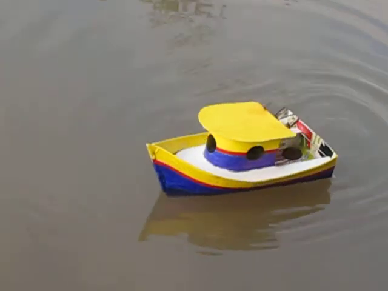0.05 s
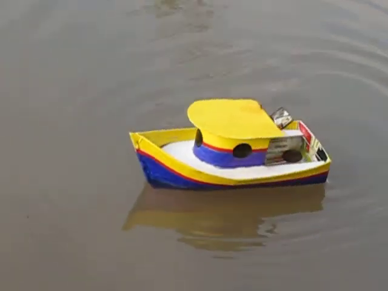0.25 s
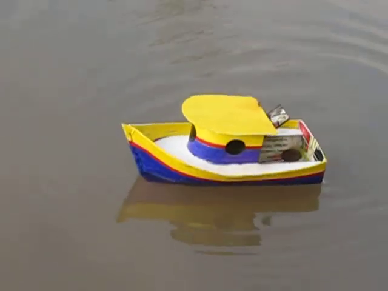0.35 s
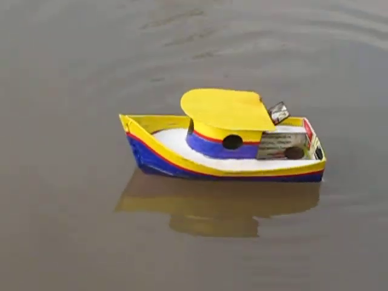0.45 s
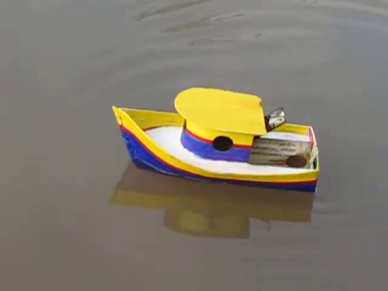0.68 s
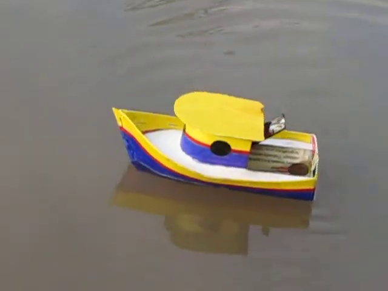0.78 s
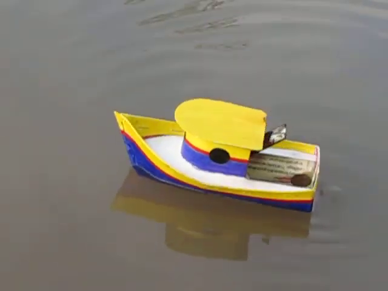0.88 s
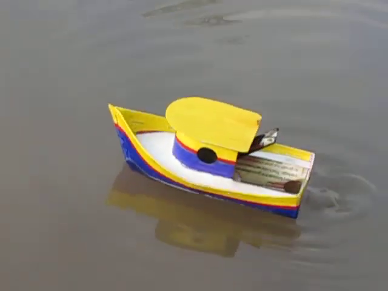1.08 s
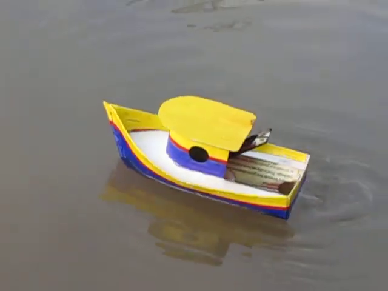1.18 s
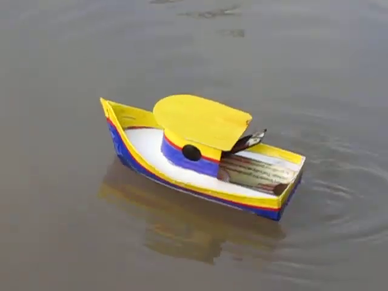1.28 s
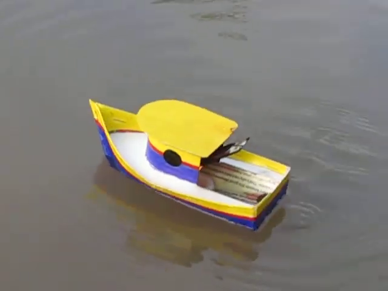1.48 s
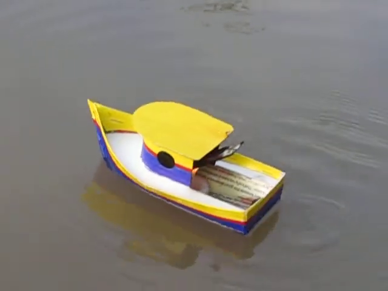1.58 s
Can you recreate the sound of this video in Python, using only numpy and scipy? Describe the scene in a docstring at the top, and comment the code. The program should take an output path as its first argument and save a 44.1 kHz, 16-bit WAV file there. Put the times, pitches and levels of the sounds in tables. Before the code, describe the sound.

A toy steam boat putters close by on a pond. From about 0.2 seconds, round tinny pops alternate evenly with lighter clicks, growing louder. From 0.8 seconds the snaps crowd together and stumble, turning brighter and thinner, until they stall near 1.4 seconds. Faint insects trill and hiss throughout over a low outdoor rumble, and a distant engine hum sinks away by about 1 second.

```python
"""A toy steam pop-pop boat turns on a pond, close by. The thin metal lid of its boiler snaps out with
a round pop and back with a lighter click, evenly at first, then louder and stumbling, until it stalls.
The snaps grow brighter and thinner as the open stern swings round; hull and bank echo them.
Insects trill on the bank and a distant engine hums over a low outdoor rumble."""
import sys
import numpy as np
from scipy import signal
from scipy.fft import rfft, irfft
from scipy.io import wavfile
from scipy.ndimage import uniform_filter1d, minimum_filter1d

SR = 44100
rng = np.random.default_rng(int(sys.argv[2]) if len(sys.argv) > 2 else 0)


def materialize(psi):
    """Save the field psi as 16-bit PCM at rate SR to the path in sys.argv[1].

    A 1-D psi becomes a single channel; in a 2-D psi each row is a channel.
    """
    bounded = np.clip(np.atleast_2d(psi).T, -1, 1)
    quanta = np.round(bounded * 32767).astype(np.int16)
    wavfile.write(sys.argv[1], SR, quanta)


N = 72765

# stereo width of the open air (frequency [Hz], side minus mid [dB])
AIR_WIDTH = [(60, -33.5), (180, -25), (310, -14.5), (530, -14), (920, -5), (2700, -3), (8000, 3.5)]


def undb(db):
    """Decibels to gain."""
    return 10 ** (np.asarray(db) / 20)


def unit(x):
    """Scale to an rms of one."""
    return x / np.sqrt(np.mean(x ** 2))


def curve(time, points):
    """Value at a given time on a line through (time, value) points."""
    return np.interp(time, *np.array(points).T)


def gains(points, size=N):
    """Gain at each frequency bin from (Hz, dB) points."""
    hz, db = np.array(points, float).T
    return undb(np.interp(np.log(np.fft.rfftfreq(size, 1 / SR) + 1e-3), np.log(hz), db))


def equalise(x, points):
    """Minimum-phase EQ through (Hz, dB) points: nothing rings ahead of an attack."""
    cepstrum = irfft(np.log(gains(points, size=2048)))
    cepstrum[1:1024] *= 2
    cepstrum[1025:] = 0
    return signal.fftconvolve(x, irfft(np.exp(rfft(cepstrum))))[:len(x)]


def stereo_noise(points, side_gain):
    """Coloured noise, left and right, with a given share of side signal."""
    mid, side = rfft(rng.standard_normal((2, N))) * gains(points)
    mid, side = irfft(mid, N), irfft(side * side_gain, N)
    return (mid + np.array([[1], [-1]]) * side) / mid.std()


def drift(rate_hz):
    """Smooth random modulation with an rms of one."""
    size = max(int(SR / rate_hz), 1)
    smoothed = uniform_filter1d(rng.standard_normal(N), size, mode="wrap")
    return unit(uniform_filter1d(smoothed, size, mode="wrap"))


def fade(t, t60):
    """Exponential decay, 60 dB down at t60."""
    return np.exp(-np.log(1000) * t / t60)


def glide(hz):
    """Sine that follows a moving pitch."""
    return np.sin(2 * np.pi * np.cumsum(hz) / SR)


def outdoor_air():
    """A bed of steady air whose low rumble swells and sinks."""
    # colour of rumble and air (frequency [Hz], level [dB])
    air_colour = [(10, -33), (19, -10.5), (26, 11.5), (36, -6), (55, 0.5), (90, -2.5), (140, -3), (215, -8),
                  (300, -15.5), (480, -23), (800, -24), (1600, -32), (3200, -35.5), (4200, -44),
                  (9000, -60.5)]
    # fader ride on the rumble (time [s], level [dB])
    rumble_ride = [(0, 3.5), (.3, 1), (.7, 3), (.95, -2), (1.15, -3), (1.35, -2.5), (1.5, 1.5), (1.65, 0.5)]
    air = undb(-34.5) * stereo_noise(air_colour, gains(AIR_WIDTH))
    rumble = signal.sosfiltfilt(signal.butter(2, 290, fs=SR, output="sos"), air)
    return air - rumble + rumble * undb(curve(np.arange(N) / SR, rumble_ride))


def distant_engine():
    """A far engine hums, each partial wavering in pitch and level, then sinks into the rumble."""
    # partials of the hum (frequency [Hz], level [dB])
    partials = [(27.2, -11), (136.5, 0.5), (173, -8), (273.5, -15.5)]
    # fader ride on the hum (time [s], level [dB])
    hum_ride = [(0, -39.5), (.25, -40.5), (.55, -34.5), (.78, -38), (.95, -50.5), (1.35, -57.5),
                (1.65, -49)]
    hum = sum(undb(db + 1.45 * drift(4.6)) * glide(hz * (1 + 0.00938 * drift(5.7)))
              for hz, db in partials)
    return np.sqrt(2) * hum * undb(curve(np.arange(N) / SR, hum_ride))


def insect_chorus():
    """Many insects blur into a steady, wide, high hiss."""
    # colour of the chorus (frequency [Hz], level [dB])
    chorus_colour = [(2000, -36), (4100, -26.5), (4600, -12.5), (5000, 0.5), (5550, -4), (5900, -24),
                     (6400, -18), (7100, -4), (7800, -8.5), (8400, -22.5), (9200, -33), (10300, -25.5),
                     (11500, -37), (15500, -41)]
    return undb(-51) * stereo_noise(chorus_colour, side_gain=undb(-2))


def near_insect():
    """One insect on the left trills in fast, rough, falling chirps."""
    trill_hz, chirp_s = 40.5, 0.022
    top_hz, fall_hz, rough_hz = 5603, 682, 90
    strokes = np.arange(N) / SR * trill_hz + 0.054 * drift(7.4) + 0.15
    trill = 0
    for offset in range(2):  # two voices take alternate chirps
        progress = np.clip((strokes + offset) % 2 / trill_hz / chirp_s, 0, 1)
        hz = top_hz - fall_hz * progress ** 2 + rough_hz * drift(1200)
        trill = trill + np.sin(np.pi * progress) * (glide(hz) + undb(-31.5) * glide(2 * hz))
    flutter = undb(1.7 * drift(30))
    pan = undb([[3.5], [-3.5]])
    return undb(-54.5) * pan * unit(trill * flutter)


def pond(x):
    """The boat is heard on the right first; hull and bank echo it and the surroundings add a faint tail."""
    # early echoes from hull and bank (delay [s], level [dB])
    echoes = [(.0029, -22.5), (.0042, -44), (.0095, -26)]
    # stereo balance of the boat (frequency [Hz], left minus right [dB])
    balance = [(500, 0.5), (1000, 0.5), (1600, -4.2), (2700, -3), (4700, 2), (8000, 0)]
    # colour of the scattered rebound (frequency [Hz], level [dB])
    rebound_colour = [(400, -9), (1000, -7), (1900, -11.5), (3000, 3.5), (4500, -17), (7000, -25),
                      (12000, -1.5)]
    left_lag_s, rebound_s = 0.000026, 0.013
    t = np.arange(N) / SR
    hz = np.fft.rfftfreq(N, 1 / SR)
    near = rfft(x) * (1 + sum(undb(db) * np.exp(-2j * np.pi * hz * delay) for delay, db in echoes))
    lean = np.sqrt(gains(balance))
    left = near * lean * np.exp(-2j * np.pi * hz * left_lag_s)
    direct = irfft(np.array([left, near / lean]), N)
    scatter = stereo_noise([(20, 0), (2930, 0), (15000, -8)], gains(AIR_WIDTH))
    decay = undb(-16.5) * unit(fade(t, t60=0.11)) + undb(-27.5) * unit(fade(t, t60=0.43))
    wash = scatter * decay * (1 - np.exp(-t / 0.0013))
    rebound_shape = unit((t > rebound_s) * fade(abs(t - rebound_s), t60=0.023))
    rebound = undb(-11) * stereo_noise(rebound_colour, gains(AIR_WIDTH)) * rebound_shape
    tail = (wash + rebound) / np.sqrt(2 * N)
    return direct + signal.fftconvolve(x[None], tail, axes=1)[:, :N]


def lid_crack(t, hz, attack_s):
    """The hard edge of a snap: a noise burst with a short, high ping."""
    # colour of the crack (frequency [Hz], level [dB])
    crack_colour = [(150, -1.5), (450, 3.5), (1000, 11.5), (2800, -2.5), (4500, -0.5), (6300, -2),
                    (8000, -11), (10500, -14.5), (15000, -18)]
    burst = rng.standard_normal(len(t)) * fade(t, t60=0.012)
    ping = undb(-7.5) * fade(t, t60=0.0088) * np.sin(2 * np.pi * hz * t)
    return equalise(2 * (burst + ping) * (1 - np.exp(-t / attack_s)), crack_colour)


def lid_ring(t, tuning, low_db, attack_s):
    """The lid's overtones give a brief tinny ring; low_db trims the lowest two."""
    # overtones of the lid (frequency [Hz], level [dB], t60 [s])
    overtones = [(1386, 3.5, 0.012), (1578, 0, 0.017), (1941, 4, 0.011), (2397, -12.5, 0.024),
                 (3705, -18.5, .016)]
    ring = sum(undb(db + low_db * (hz < 1800)) * fade(t, t60) * np.sin(2 * np.pi * hz * tuning * t)
               for hz, db, t60 in overtones)
    return ring * (1 - np.exp(-t / attack_s))


def lid_pop(t, start_hz, rest_hz, attack_s):
    """The round body of a snap: a tone that glides to the lid's resting pitch."""
    settle_s = 0.0037
    hz = rest_hz + (start_hz - rest_hz) * np.exp(-t / settle_s)
    envelope = (1 - np.exp(-(t / attack_s) ** 2.2)) * fade(t, t60=0.017)
    return envelope / envelope.max() * glide(hz)


def boiler():
    """The lid snaps out and back; each snap is a pop, a ring and a crack heard through the open stern."""
    # snaps of the lid (time [s], starting pop pitch [Hz], pop level [dB], pop attack [s],
    # overtone tuning [ratio], ring level [dB], crack pitch [Hz], crack level [dB])
    snaps = [ (.1590, 806, -35, 0.0011, 0.957, -29.5, 3800, -53),
             (0.2224, 660, -19, 0.0025, 1.103, -17, 2030, -24),
             (0.307, 790, -37, 0.0017, 0.99, -18.5, 4200, -27.5),
             (.3720, 665, -12, 0.0013, 0.973, -13.5, 4800, -22),
             (0.4517, 800, -37.5, 0.00077, .99, -19.5, 3930, -28),
             (0.51, 610, -10.5, 0.0017, 0.867, -11.5, 4320, -18.5),
             (.5873, 860, -34, 0.00047, 0.95, -22, 3940, -26.5),
             (0.6432, 667, -11, 0.0012, 0.798, -11.5, 4060, -15),
             (0.7167, 890, -31, 0.00025, .97, -22.5, 4000, -25.5),
             (0.7681, 626, -9.5, 0.0012, 0.848, -18, 3840, -19.5),
             (0.8382, 1120, -20, 0.0015, 1.07, -20.5, 3760, -21.5),
             (0.859, 720, -9, 0.0025, 0.95, -11.5, 4900, -13),
             (.8850, 1037, -6.5, 0.00096, 0.978, -9.5, 4730, -10),
             (0.8929, 848, -12.5, 0.00079, 0.66, -24.5, 3800, -46.5),
             (0.9404, 803, -25, 0.0015, 1.1, -43, 4000, -53),
             (.9620, 1150, -20, 0.00096, 1, -22, 4050, -25.5),
             (.9730, 910, -17.5, 0.0015, 0.994, -13.5, 4950, -14),
             (1.0114, 950, -8.5, 0.0012, 0.953, -9, 4600, -13.5),
             (1.0275, 1100, -34, 0.00027, 1.1, -26.5, 3830, -32),
             (1.0617, 880, -18.5, 0.001, 0.95, -25, 4500, -55),
             (1.0823, 1200, -20.5, 0.0011, .99, -10, 4900, -16),
             (1.123, 943, -14.5, 0.00079, 1.2, -15, 3760, -12),
             (1.139, 1130, -21, 0.00052, 0.87, -15.5, 4560, -43),
             (1.1469, 888, -7.5, 0.00082, 0.964, -10.5, 3430, -10),
             (1.1697, 796, -13, 0.00027, 1.04, -26, 4200, -51),
             (1.1920, 1010, -11.5, 0.0011, 0.99, -16.5, 4880, -20),
             (1.2313, 1090, -13, 0.00094, 1.04, -17, 3750, -11.5),
             (1.331, 1470, -16.5, 0.0004, 0.98, -20, 4700, -24),
             (1.3706, 1046, -15.5, 0.00095, 1.02, -12, 4030, -14.5)]
    # the lid tightens as the boiler gets going (time [s], resting pitch [Hz], low overtone trim [dB])
    tension = [(.22, 786, -17), (.37, 998, -7.5), (.45, 1050, -8), (.52, 1120, -3), (.78, 1123, 0.5),
               (.88, 1095, -2), (1.37, 1094, 0.5)]
    # passband as the open stern turns round (time [s], upper edge [Hz], lower edge [Hz])
    stern_band = [(.2, 4400, 367), (.5, 4800, 334), (.78, 4370, 323), (0.881, 6850, 333), (1.02, 8150, 412),
                  (1.15, 7000, 402), (1.23, 10600, 720), (1.37, 12500, 473)]
    tension, stern_band = np.array(tension), np.array(stern_band)
    t = np.arange(2048) / SR
    out = np.zeros(N + len(t))
    for start, pop_hz, pop_db, attack_s, tuning, ring_db, crack_hz, crack_db in snaps:
        rest_hz, low_db = (curve(start, tension[:, [0, column]]) for column in (1, 2))
        upper_hz, lower_hz = (curve(start, stern_band[:, [0, column]]) for column in (1, 2))
        pop = undb(pop_db) * lid_pop(t, pop_hz, rest_hz, attack_s)
        ring = undb(ring_db) * lid_ring(t, tuning, low_db, 0.76 * attack_s)
        crack = undb(crack_db) * lid_crack(t, crack_hz, 0.36 * attack_s)
        stern = signal.butter(3, [lower_hz, upper_hz], "band", fs=SR, output="sos")
        out[int(start * SR) + np.arange(len(t))] += signal.sosfilt(stern, pop - ring + crack)
    return out[:N]


def scene():
    """The boat up front, with insects, engine and air behind it."""
    return pond(boiler()) + near_insect() + insect_chorus() + distant_engine() + outdoor_air()


def record(dry):
    """A fast limiter holds down the highest peaks and a steep low-pass trims the very top."""
    ceiling, window_s, top_hz = 0.92, 0.003, 15900
    size = int(window_s * SR)
    gain = ceiling / np.maximum(abs(dry).max(axis=0), ceiling)
    gain = uniform_filter1d(minimum_filter1d(gain, size), size)
    return signal.sosfilt(signal.ellip(8, .2, 70, top_hz, fs=SR, output="sos"), dry * gain)


dry = scene()
out = record(dry)
materialize(out)
```